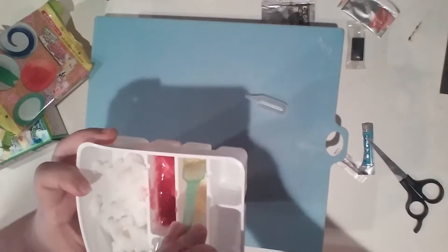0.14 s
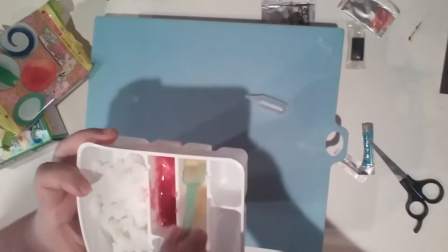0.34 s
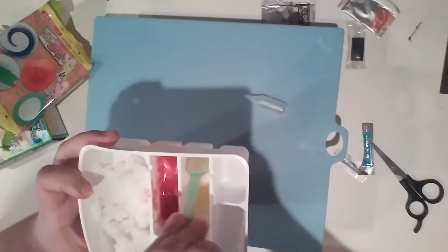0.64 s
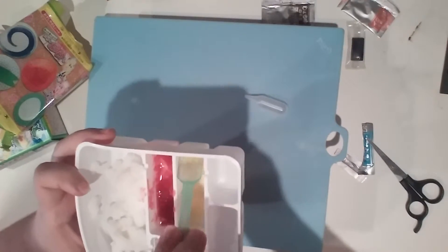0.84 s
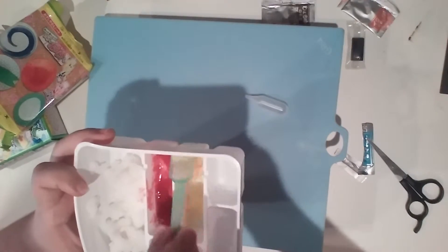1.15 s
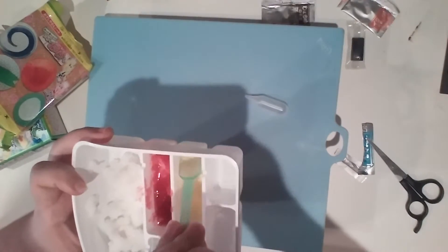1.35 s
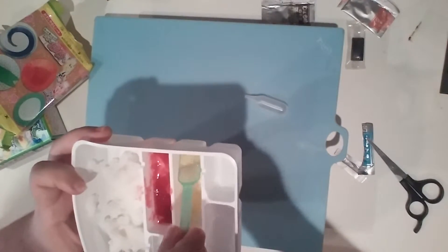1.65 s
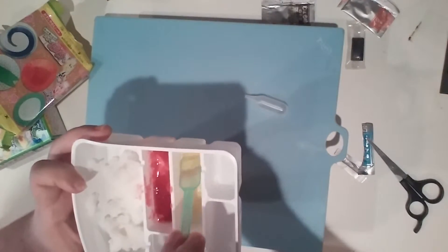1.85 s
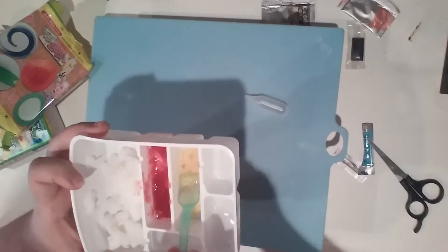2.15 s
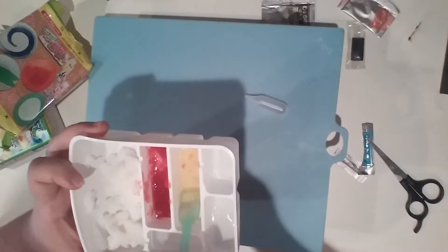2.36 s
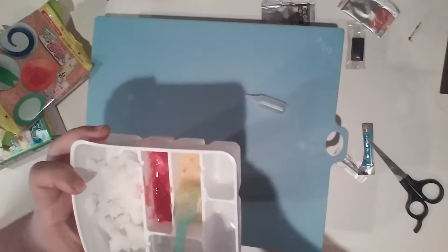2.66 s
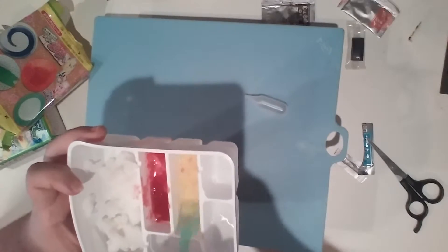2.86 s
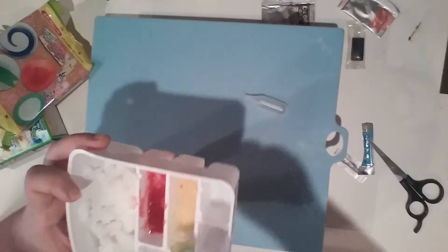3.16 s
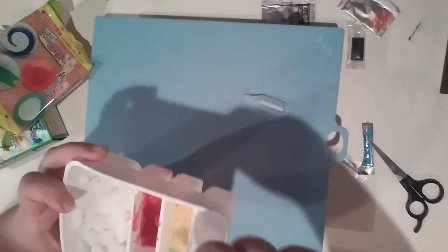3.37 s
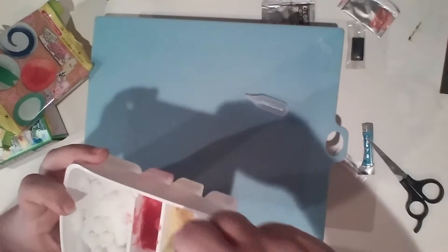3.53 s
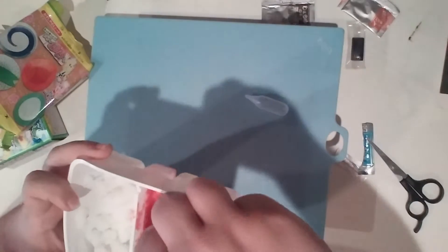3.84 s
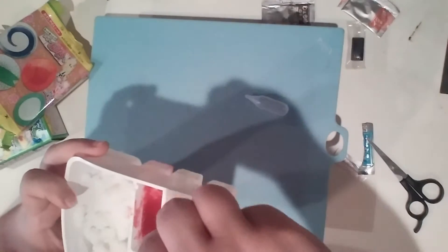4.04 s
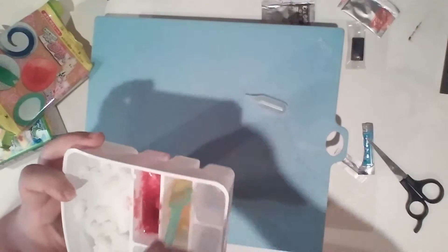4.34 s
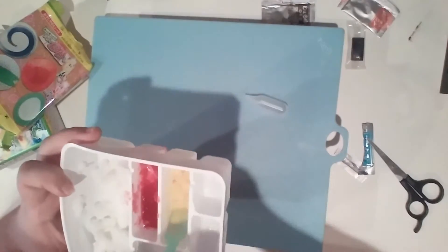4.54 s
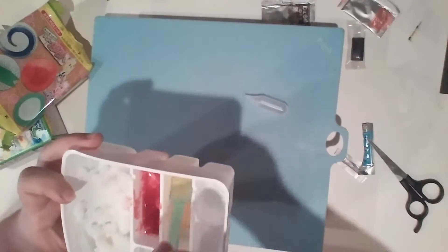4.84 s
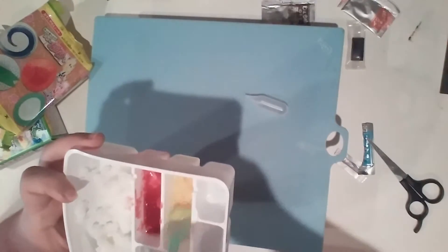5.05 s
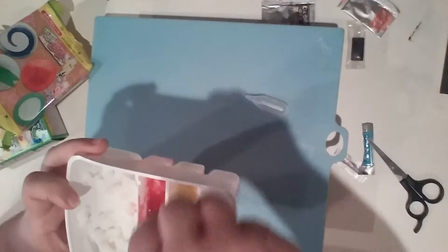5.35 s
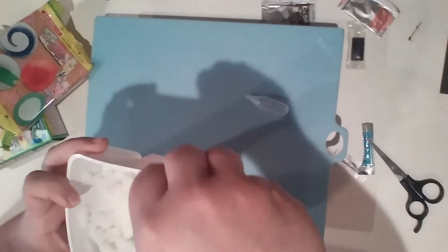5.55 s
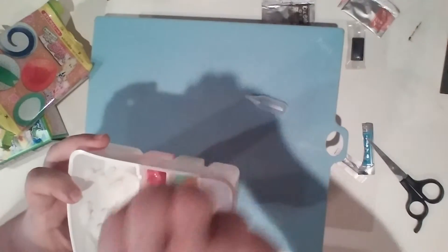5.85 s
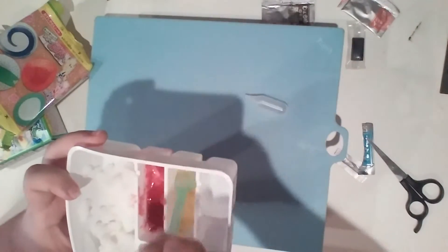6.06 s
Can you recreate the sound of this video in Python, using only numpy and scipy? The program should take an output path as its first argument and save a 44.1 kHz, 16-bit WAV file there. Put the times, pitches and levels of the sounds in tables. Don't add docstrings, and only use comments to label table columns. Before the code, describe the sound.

Very close in a small room, a plastic spoon stirs sticky paste in a thin tray: quick rasps, crisp snaps and light hollow knocks. After about two seconds the strokes slow into separate scrapes. A sharp clack lands before four seconds, a short clatter follows near five, then faint scrapes trail off. A low, soft hum continues; noise suppression clips the treble between sounds.

```python
import sys
import numpy as np
from scipy import signal
from scipy.fft import rfft, irfft
from scipy.io import wavfile
from scipy.ndimage import uniform_filter1d

SR = 44100
rng = np.random.default_rng(int(sys.argv[2]) if len(sys.argv) > 2 else 0)


def int16_out(signal):
    q = np.round(np.clip(np.atleast_2d(signal).T, -1, 1) * 32767)
    wavfile.write(sys.argv[1], SR, q.astype(np.int16))


def linear_from_db(decibels):
    return 10 ** (np.asarray(decibels, float) / 20)


N = 273420


def colour(x, points):
    hz, db = np.transpose(points)
    log_hz = np.log(np.fft.rfftfreq(N, 1 / SR) + 1)
    gain = linear_from_db(np.interp(log_hz, np.log(hz), db, left=-90, right=-90))
    return irfft(rfft(x) * gain / np.sqrt(np.mean(gain ** 2)), N)


def noise(alike):
    common, left, right = rng.standard_normal((3, N))
    return np.sqrt(alike) * common + np.sqrt(1 - alike) * np.array([left, right])


def walk(rate_hz):
    hold = int(SR / rate_hz)
    steps = rng.standard_normal(N // hold + 1)
    return uniform_filter1d(np.repeat(steps, hold), hold)[:N]


def wavering_lines(lines, alike):
    total = 0
    for hz, width, db in lines:
        peak = [(hz - width, -12), (hz, 0), (hz + width, -12)]
        total = total + linear_from_db(db) * colour(noise(alike), peak)
    return total


# (frequency [Hz], density [dB per Hz])
LEAK_COLOUR = [(470, -35), (800, -5.5), (1350, -20.5), (1790, -21.5), (2570, -25), (2890, -20.5),
               (4240, -28.5), (9270, -16), (13000, -28)]


def leak():
    level_db = -82.5 + 1.5 * walk(5)
    return linear_from_db(level_db) * colour(noise(0), LEAK_COLOUR)


# (frequency [Hz], density [dB per Hz])
RUMBLE_COLOUR = [(12, -35.5), (20, -4), (64, -3), (98, -1.5), (130, -5), (163, -18), (211, -14.5),
                 (247, -21), (339, -20), (425, -23), (552, -30.5), (811, -39.5), (885, -41), (1070, -66.5),
                 (1300, -61.5), (1690, -92), (2860, -120)]


def rumble():
    low_cut = signal.butter(2, 42, "high", fs=SR, output="sos")
    return signal.sosfilt(low_cut, colour(noise(0.91), RUMBLE_COLOUR))


# (frequency [Hz], density [dB per Hz])
DRONE_COLOUR = [(110, -32), (138, 3.5), (150, -6.5), (166, 1), (182, -12.5), (200, -8.5), (250, -22.5)]


def drone():
    gone_s, near_db, rest_db = 0.7, 6.5, -7
    level_db = np.interp(np.arange(N) / SR, [gone_s / 2, gone_s], [near_db, rest_db]) - 5.5
    return linear_from_db(level_db) * colour(noise(0.89), DRONE_COLOUR)


# (frequency [Hz], width [Hz], level [dB])
MOTOR_LINES = [(64, 16, -9), (105.5, 10, -9.5), (136, 12, -16.5), (199.9, 13, -18.5)]


def motors():
    return wavering_lines(MOTOR_LINES, 0.98)


# (frequency [Hz], width [Hz], level [dB])
WHINE_LINES = [(282.6, 8, -33), (348, 10, -27.5), (420.4, 8, -28.5)]


def whine():
    on_s, off_s, fade_s = 1.805, 2.7, 0.15
    t = np.arange(N) / SR
    running = np.clip(np.minimum(t - on_s, off_s - t) / fade_s, 0, 1)
    return running * wavering_lines(WHINE_LINES, 0.9)


# (time [s], level [dB])
HUM_SWELL = [(0.0, -51.5), (1.4, -49), (1.95, -53), (2.12, -50), (3.1, -51), (3.5, -53), (4.0, -53.5),
             (4.25, -58.5), (5.501, -54), (6.0, -56), (6.2, -52.5)]


def hum():
    s, db = np.transpose(HUM_SWELL)
    level_db = np.interp(np.arange(N) / SR, s, db) + 1.1 * walk(10)
    return linear_from_db(level_db) * (rumble() + drone() + motors() + whine()) * linear_from_db([[1.5], [-1.5]])


# (frequency [Hz], level [dB])
TAIL_COLOUR = [(600, -32), (1000, -9.5), (3000, -1.5), (6000, 1.5), (9000, -6), (13000, -15.5),
               (16500, -21.5)]
# (left delay [s], right delay [s], level [dB])
ECHOES = [(.0013, 0.0012, 5.5), (.0058, .0056, -3.5), (.0072, 0.0099, 1), (.012, .0105, -26)]


def room(x):
    t60_s, tail_db, build_s = 0.2, -8.5, 0.026
    t = np.arange(N) / SR
    tail = colour(noise(0), TAIL_COLOUR) * linear_from_db(-60 * t / t60_s) * np.clip(t / build_s, 0, 1)
    response = linear_from_db(tail_db) * tail / np.sqrt(np.sum(tail[0] ** 2))
    response[:, 0] = 1
    for left_s, right_s, db in ECHOES:
        response[0, int(left_s * SR)] -= linear_from_db(db)
        response[1, int(right_s * SR)] += linear_from_db(db)
    return signal.fftconvolve(x, response[:, :SR // 2], axes=1)[:, :N]


# (time [s], peak level [dB], low tray level [dB], low tray frequency [Hz])
STIR_SNAPS = [(.0166, -34.5, -22, 970), (.0333, -39.5, -2.3, 1103), (.0972, -40.5, -13, 1030),
              (.1331, -39, -18, 1040), (.4105, -49.5, -15, 1004), (.5051, -47, -8, 1060),
              (.5754, -20.5, -31.5, 1030), (.6437, -25.5, -28, 1000), (.6543, -25.5, -14, 1010),
              (.676, -26.5, -18.5, 879), (.722, -29, -24, 930), (.846, -38, -9, 1010),
              (.8624, -29.5, -11, 1408), (.895, -36, -10, 1030), (.9354, -36, -4, 1460),
              (.9689, -21.5, -6.5, 1666), (1.0096, -14.5, -23.5, 1030), (1.2017, -18, -13.5, 1000),
              (1.2345, -37, -15.5, 1040), (1.262, -28.5, -6, 1670), (1.2766, -26.5, -11, 1680),
              (1.3653, -41, -11.5, 1030), (1.5743, -46, -1.5, 1019), (1.527, -43, -8.5, 1030),
              (1.551, -48, -4.5, 1040), (1.594, -44, -2.5, 1010), (1.612, -46, -3, 1010),
              (1.325, -44, -5, 1030), (1.6317, -34.5, -29.5, 1030)]
SCRAPE_SNAPS = [(1.7888, -44.5, -30.5, 861), (2.2199, -48.5, -3, 1532), (2.365, -37.5, -24, 879),
                (2.4917, -41, -20, 970), (2.7427, -40.5, -3.5, 1190), (2.7522, -34, -16.5, 1690),
                (2.8883, -48, -18, 1095), (2.9312, -27.5, -23, 1030), (3.3533, -40, -12, 992),
                (4.7451, -44.5, -7, 1680), (5.236, -42, -10.5, 1080), (5.303, -44, -12, 1510),
                (5.6625, -37, -21, 1590), (6.0759, -36, -31.5, 1030)]
# (time [s], peak level [dB], low tray level [dB],
# low tray frequency [Hz], upper tray level [dB])
CLACKS = [(0.3251, -44, 2, 1060, -22), (0.9771, -30, 0.7, 1630, -6), (.9824, -16.5, -9, 964, -7.5),
          (0.9911, -23, -28, 998, -8), (1.097, -35, -17, 886, -2.5), (2.6204, -40, -15, 876, -27),
          (3.6306, -46, -9.5, 1203, -19), (3.6612, -16.5, -32, 1150, -38), (3.714, -10.5, -21.5, 1049, -20),
          (3.8143, -36, -8, 1028, -5), (4.76, -34, -5, 1620, -7), (4.8149, -32, -1.5, 1115, -2),
          (4.8333, -24.5, -0.8, 1056, -3.5), (4.906, -39.5, -8, 1040, -4.5),
          (4.8601, -34.5, -7.5, 1045, -3.5)]


def blows():
    snap_edge_db, clack_edge_db = -19.5, -8
    rows = [(s, db, clack_edge_db, low_db, hz, upper_db) for s, db, low_db, hz, upper_db in CLACKS]
    for table, base_db in (STIR_SNAPS, -4.5), (SCRAPE_SNAPS, -20):
        for s, db, low_db, hz in table:
            rows.append((s, db, snap_edge_db, low_db, hz, base_db + 0.51 * low_db))
    return rows


def ring(modes, detune, scatter_db, attack_s):
    t = np.arange(SR // 10) / SR
    hz, db, t60_s = np.transpose(modes)[:, :, None]
    pitch_chance, level_chance = rng.standard_normal((2, len(modes), 1))
    level = linear_from_db(db + scatter_db * level_chance - 60 * t / t60_s)
    y = np.sum(level * np.sin(2 * np.pi * hz * (1 + detune * pitch_chance) * t), axis=0)
    y = y * (1 - np.exp(-(t / attack_s) ** 2))
    return y / np.max(np.abs(y))


def tick():
    decay_s = 0.0014
    t = np.arange(SR // 10) / SR
    thin = signal.butter(2, 2800, "high", fs=SR, output="sos")
    return signal.sosfilt(thin, rng.standard_normal(len(t)) * np.exp(-t / decay_s))


# (frequency [Hz], level [dB], 60 dB decay [s])
LOW_TRAY = [(413, -22.5, 0.094), (913, -18.5, 0.056), (1030, -7.5, 0.03), (1460, -3.5, 0.019),
            (1680, -8, 0.03)]
UPPER_TRAY = [(2440, 5, 0.027), (2770, -5.5, 0.019), (3180, 1, 0.011), (3920, -11, 0.058)]
SPOON_EDGE = [(5370, -4, 0.0069), (5930, -3.5, 0.0099), (6304, 1.5, 0.0069)]
CRACK = [(7230, 1.5, 0.0016), (8240, 0, 0.0098), (9090, -1, .008), (9940, -9, 0.0052), (11150, -8.5, .004),
         (12100, -9.5, 0.0027), (14040, -10, 0.0049)]


def taps():
    dull, bright = np.zeros((2, 2, N + SR))
    for s, db, edge_db, low_db, low_hz, upper_db in blows():
        low = linear_from_db(low_db + 4) * ring([(low_hz, 0, 0.04)] + LOW_TRAY, 0.0028, 1.3, 0.0015)
        high = ring(CRACK, 0.043, 2.5, 0.00028)
        high = high + linear_from_db(edge_db + 3.5) * ring(SPOON_EDGE, 0.012, 2.2, 0.00068)
        high = high + linear_from_db(upper_db) * ring(UPPER_TRAY, 0.03, 6.7, 0.00061)
        high = high + linear_from_db(-10.5) * tick()
        i, size = int(s * SR), len(low)
        dull[:, i:i + size] += linear_from_db(db) * low * linear_from_db([[-1.2], [1.2]])
        bright[0, i:i + size] += linear_from_db(db + 1.6) * high
        bright[1, i + 2:i + 2 + size] += linear_from_db(db - 1.6) * high
    return dull[:, :N] * linear_from_db(-2), bright[:, :N] * linear_from_db(-2.5)


def stroke(t, start, length, db, build_db, tire_db_per_s):
    close_db_per_s, ajar_db, shut_db_per_s = 301.5, -80, 81
    since = t - start
    held = np.clip(since, 0, length)
    level = db - build_db * (1 - held / length) - tire_db_per_s * held
    level = level - close_db_per_s * (since - held)
    last_db = db - tire_db_per_s * length
    ajar_from = length + (last_db - ajar_db) / close_db_per_s
    ajar = ajar_db - shut_db_per_s * np.maximum(since - ajar_from, 0)
    return np.where(since < 0, -200, np.maximum(level, ajar))


# (start [s], length [s], rasp level [dB], tray share [dB], loudest tray resonance [Hz])
JERKS = [(0.015, 0.082, -43.5, -7, 2400), (0.414, 0.016, -50.5, -12.5, 3260),
         (0.506, 0.073, -55.5, -13, 2690), (0.574, 0.1, -35, -15.5, 2690),
         (0.675, 0.085, -37.5, -10.5, 3100), (0.849, 0.079, -38.5, -10.5, 2850),
         (0.965, 0.034, -34, -3.5, 2127), (0.98, 0.0032, -26.5, 1.5, 2150),
         (1.016, 0.1812, -34, -5.5, 2750), (1.199, 0.053, -40, -7, 1934),
         (1.255, 0.052, -37.5, -8, 1723), (1.397, 0.099, -55, -11.5, 2700),
         (1.656, 0.079, -63, -16, 2530), (1.789, 0.0092, -57.5, -9.5, 3110),
         (2.168, 0.0084, -62.5, -14, 1723), (2.217, .01, -57.5, -9, 1630),
                (2.335, .03, -61, -15, 2600), (2.364, 0.049, -46.5, -15, 3800),
                (2.492, 0.046, -45.5, -13.5, 1740), (2.621, 0.013, -46.5, -8.5, 2480),
                (2.888, .04, -50, -14.5, 2140), (2.981, 0.087, -41.5, -6.5, 2300),
                (3.522, .09, -59, -17.5, 2200), (3.661, .05, -37.5, -21.5, 3920),
                (3.715, 0.13, -34, -10, 3630), (4.422, 0.0097, -72.5, -20, 2110),
                (4.845, .07, -40, -2, 2600), (4.99, 0.045, -66, -10.5, 2710), (5.81, .01, -75.5, -17, 2303),
                (5.238, .03, -49.5, -11, 1580), (5.661, 0.0087, -49, -8.5, 2660),
                (6.078, 0.035, -44, -18, 3210)]
# (start [s], length [s], final rasp level [dB], tray share [dB], loudest tray resonance [Hz])
PUSHES = [(0.0, .013, -50, -12, 2400), (2.929, 0.043, -40.5, -12, 2500), (0.128, 0.12, -46, -11, 2420),
          (0.304, 0.036, -48, -6.5, 1400), (0.917, 0.042, -40, -7, 1710), (1.339, 0.043, -44, -10, 2380),
          (1.498, 0.13, -48.5, -9, 2417), (2.729, 0.031, -47.5, -7.5, 1488),
          (3.277, 0.095, -48, -17.5, 2450), (4.651, 0.026, -61.5, -13.5, 2850),
          (4.747, .097, -39.5, -1.2, 4050), (3.622, 0.024, -47.5, -18, 2185),
          (5.133, 0.034, -60.5, -17, 2096), (5.281, 0.034, -51.5, -9.5, 1560),
          (5.402, 0.12, -57.5, -10.5, 1804), (5.504, 0.14, -51.5, -15, 1920)]


def strokes():
    t = np.arange(0, N + 64, 32) / SR
    jerks = JERKS
    levels = [stroke(t, s, length, db, 0, 99.5) for s, length, db, _, _ in jerks]
    levels += [stroke(t, s, length, db, 6.5, 0) for s, length, db, _, _ in PUSHES]
    share_db, hz = np.transpose(jerks + PUSHES)[3:]
    lead = np.argmax(levels, axis=0)
    controls = linear_from_db(np.max(levels, axis=0)), linear_from_db(share_db[lead]), hz[lead]
    return [uniform_filter1d(np.interp(np.arange(N) / SR, t, c), size=220) for c in controls]


def grains():
    strength = np.minimum(rng.exponential(size=N // 40 + 1), 4)
    grit = linear_from_db(2.3 * strength).repeat(40)[:N]
    return grit / np.sqrt(np.mean(grit ** 2))


# (frequency [Hz], density [dB per Hz])
RASP_COLOUR = [(2060, -49), (3500, -16), (4540, -26), (5360, -15.5), (5900, -12.5), (7850, 1.5), (9500, 2),
               (15000, -18.5), (15650, -14)]


def rasp_hiss(grit):
    hiss = colour(noise(0.07) * grit, RASP_COLOUR) * linear_from_db(1.7 * walk(60))
    top = signal.sosfilt(signal.butter(2, 10500, "high", fs=SR, output="sos"), hiss)
    return hiss + (linear_from_db(0.89 * walk(6.5)) - 1) * top


# (frequency [Hz], width [Hz], level [dB])
WALLS = [(910, 83, 0), (1040, 190, 3.5), (1550, 390, -2.5), (2044, 210, -5), (2480, 370, -1.5),
         (2864, 320, -5), (3460, 470, -7), (4550, 490, -1), (5470, 800, -3), (6030, 700, 3)]


def tray_drag(grit, centre_hz):
    rub, drag = noise(0.24) * grit, 0
    for hz, width, db in WALLS:
        b, a = signal.iirpeak(hz, hz / width, SR)
        near_db = -6 * np.minimum(np.abs(np.log2(centre_hz / hz)), 1.5)
        flicker_db = 2.5 * walk(40)
        wall = signal.lfilter(b, a, signal.lfilter(b, a, rub))
        drag = drag + linear_from_db(db + near_db + flicker_db) * wall
    return drag


def stirring():
    level, share, centre_hz = strokes()
    grit = grains()
    hiss = rasp_hiss(grit) * linear_from_db([[2.5], [-2.5]])
    drag = share * tray_drag(grit, centre_hz) * linear_from_db([[16], [13]])
    return linear_from_db(1) * level * (hiss + drag)


def scene():
    dull, bright = taps()
    return leak() + hum() + room(bright + 0.19 * dull) + 0.7 * dull + stirring()


def drop_weak_bands(x):
    hz, t, z = signal.stft(x, SR, nperseg=1024)
    band = np.digitize(hz, np.geomspace(1300, 16500, num=48))
    power = np.array([np.mean(np.abs(z[:, band == k]) ** 2, axis=(0, 1)) for k in range(49)])
    power = uniform_filter1d(power, size=3, axis=1)
    chance = rng.standard_normal((49, len(t) // 3 + 1)).repeat(3, axis=1)[:, :len(t)]
    threshold_db = -25 + 5 * chance
    keep = power > np.max(power[1:], axis=0) * linear_from_db(threshold_db) ** 2
    keep[0] = True
    return signal.istft(z * np.maximum(keep[band], 0.01), SR, nperseg=1024)[1][:, :N]


def band_limit(x):
    return signal.sosfilt(signal.butter(12, 16640, fs=SR, output="sos"), x)


def record(dry):
    top_cut = signal.ellip(8, 0.2, 70, 15950, fs=SR, output="sos")
    mix = signal.sosfilt(top_cut, drop_weak_bands(dry))
    return band_limit(mix)


dry = scene()
out = record(dry)
int16_out(out)
```